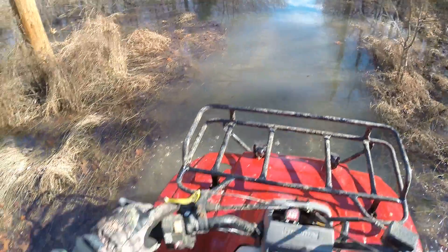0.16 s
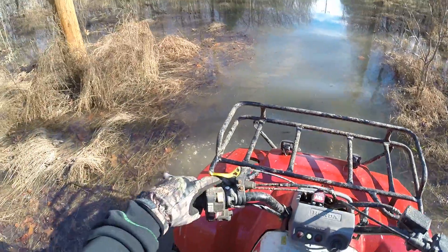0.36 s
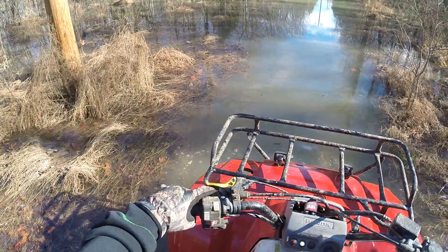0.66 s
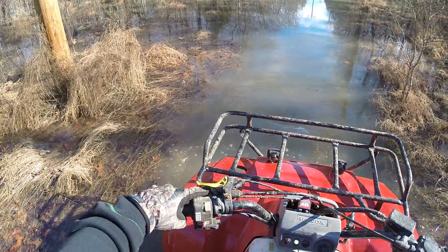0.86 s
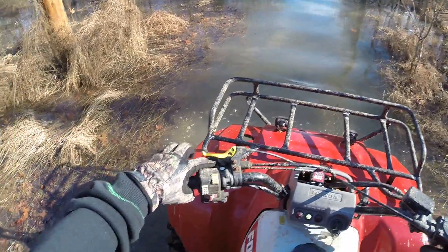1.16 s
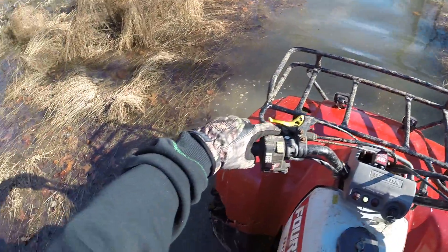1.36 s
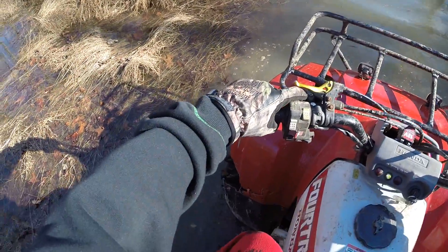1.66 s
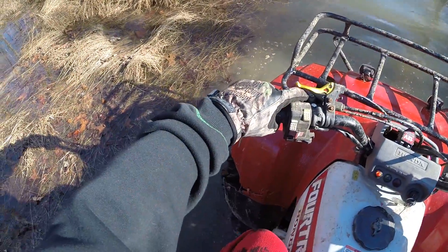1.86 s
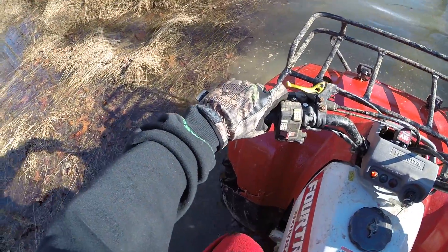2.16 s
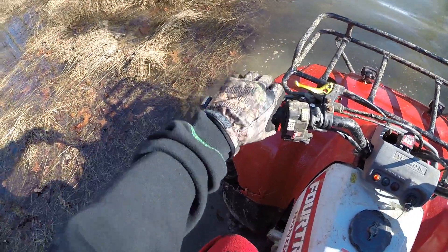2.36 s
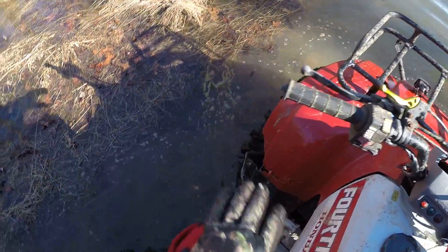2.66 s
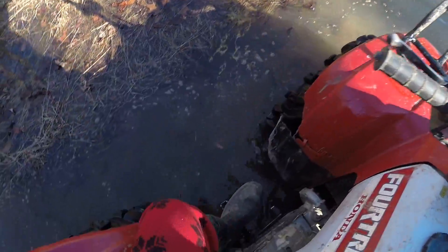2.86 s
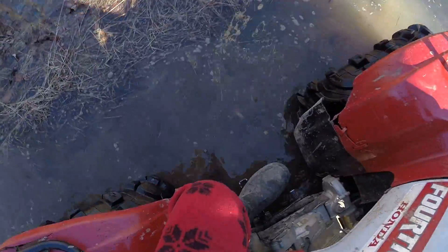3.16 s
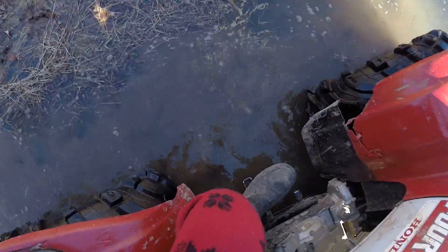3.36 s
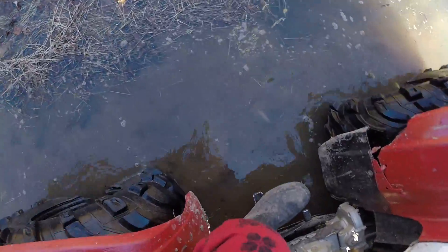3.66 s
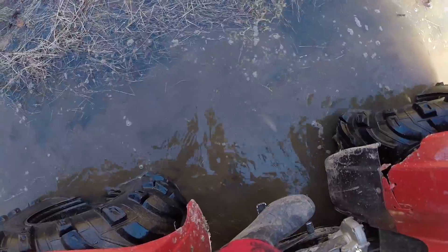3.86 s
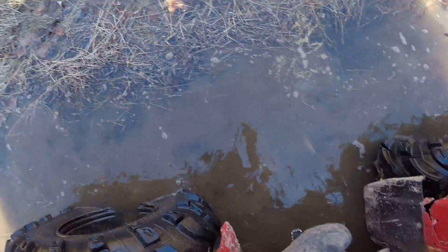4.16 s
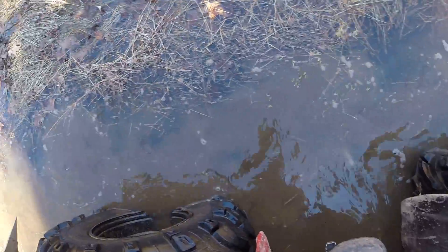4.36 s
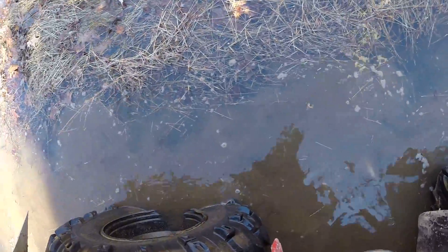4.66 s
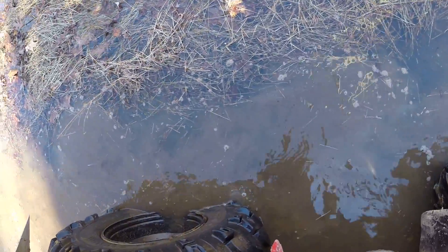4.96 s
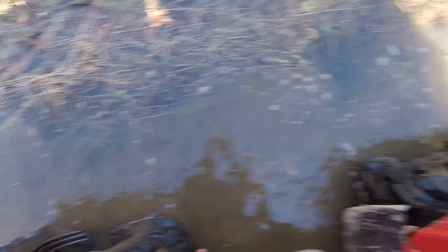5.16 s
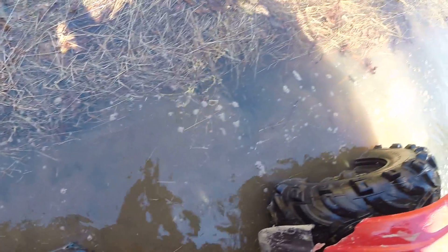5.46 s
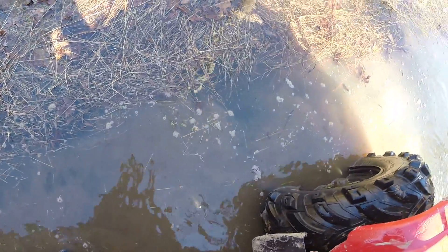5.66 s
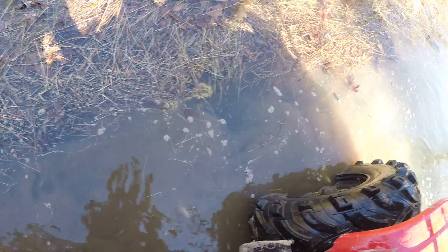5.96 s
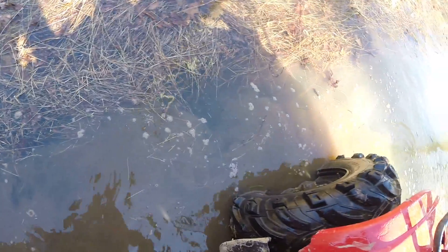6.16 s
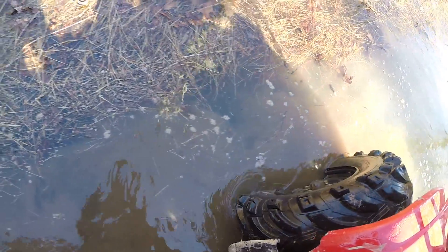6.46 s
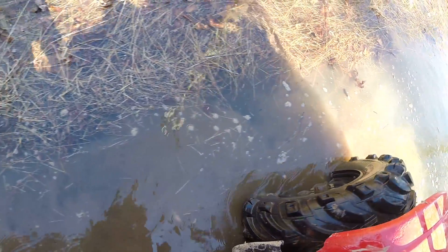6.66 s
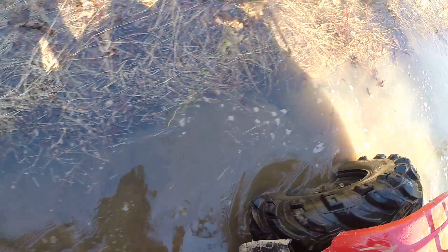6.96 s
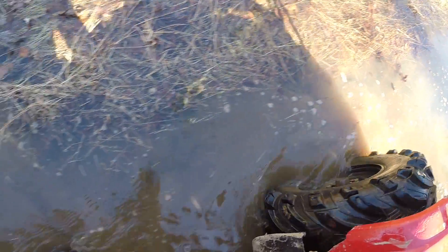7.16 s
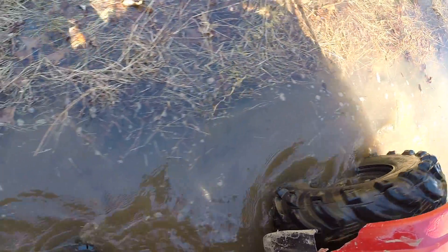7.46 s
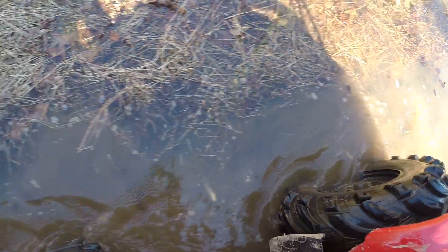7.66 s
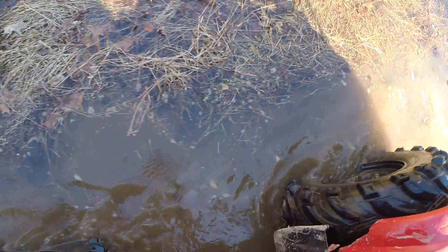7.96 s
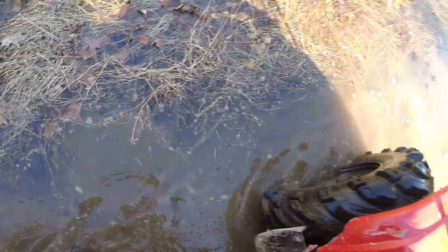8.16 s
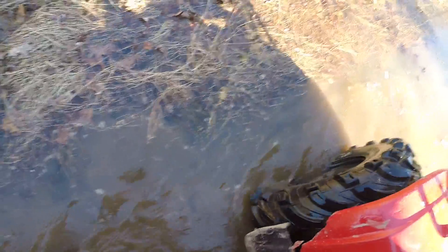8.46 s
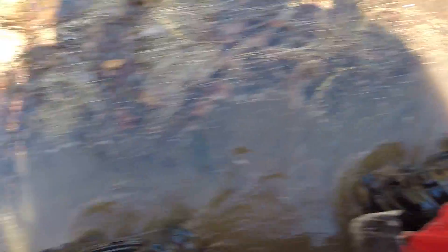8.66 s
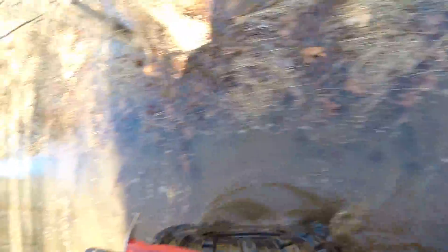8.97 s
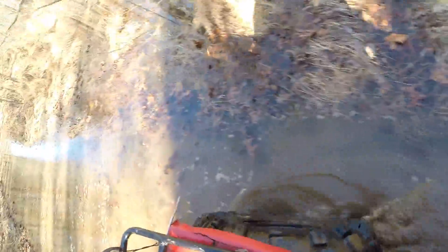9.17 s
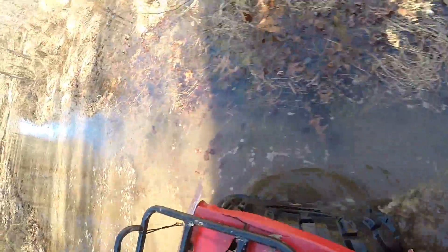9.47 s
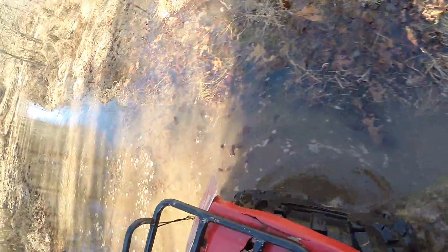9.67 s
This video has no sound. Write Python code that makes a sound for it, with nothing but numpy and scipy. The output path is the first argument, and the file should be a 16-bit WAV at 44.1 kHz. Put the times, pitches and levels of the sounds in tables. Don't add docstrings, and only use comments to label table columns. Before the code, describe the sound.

Close, lumpy quad bike idle with misfires, a sharp lever snap, then faster chugging under throttle while water burbles softly at the wheel.

```python
import sys
import numpy as np
from scipy import signal
from scipy.fft import rfft, irfft
from scipy.io import wavfile
from scipy.ndimage import uniform_filter1d

SR = 44100
rng = np.random.default_rng(int(sys.argv[2]) if len(sys.argv) > 2 else 0)


def waveform_to_disk(signal):
    frames = np.transpose(np.atleast_2d(signal))
    scaled = np.clip(frames, -1, 1) * 32767
    samples = np.round(scaled).astype(np.int16)
    wavfile.write(sys.argv[1], SR, samples)


def gain_from_decibels(decibels):
    exponent = np.asarray(decibels, float) / 20
    return 10 ** exponent


N = 433062
TIME = np.arange(N) / SR
HZ = np.fft.rfftfreq(N + 2394, 1 / SR) + 1


def curve(table, column=1):
    return np.interp(TIME, [row[0] for row in table], [row[column] for row in table])


def unit(x):
    return x / np.sqrt(np.mean(x ** 2))


def colour(x, gain):
    return irfft(rfft(x, 2 * len(HZ) - 2) * gain)[:N]


def band(lo_hz, hi_hz, order=4):
    low_cut = 1 + (lo_hz / HZ) ** (2 * order)
    high_cut = 1 + (HZ / hi_hz) ** (2 * order)
    return 1 / np.sqrt(low_cut * high_cut)


def walk(rate):
    k = int(SR / rate)
    held = np.repeat(rng.standard_normal(N // k + 1), k)[:N]
    return unit(uniform_filter1d(uniform_filter1d(held, k), k))


def span(start_ms, end_ms):
    return np.arange(int(start_ms * SR / 1000), int(end_ms * SR / 1000)) / SR


def add(out, t, piece):
    i = int(t * SR)
    part = piece[max(-i, 0):max(N - i, 0)]
    out[max(i, 0):max(i, 0) + len(part)] += part


# t/s, firing rate/Hz, full thump level/dB
ENGINE = [(0.0, 12.705, -26.8), (0.8, 11.427, -26.7), (3.09, 10.423, -26.1), (4.36, 10.611, -24.7),
          (4.96, 11.669, -24.5), (5.87, 11.766, -23.6), (5.99, 13.896, -22.5), (6.13, 15.395, -21.5),
          (6.62, 16.04, -21.6), (6.96, 15.757, -21.7), (7.79, 13.866, -22.9), (8.17, 14.379, -23.0),
          (8.4, 16.402, -21.9), (8.83, 17.051, -21.5), (9.24, 16.281, -23.8), (9.41, 14.623, -24.7),
          (9.63, 12.96, -24.4), (9.82, 14.487, -24.2)]
# t/s, shortfall level/dB, share of a cycle the flywheel then loses
MISFIRES = [(0.083, -2.5, 0.043), (0.166, -1.0, 0.019), (0.414, -18.0, 0.093), (0.677, -1.0, 0.103),
            (0.77, -1.5, 0.1), (1.044, -4.0, 0.031), (1.309, -11.5, -0.002), (1.495, -5.5, 0.103),
            (1.678, -1.5, 0.038), (1.774, -4.0, 0.058), (1.87, -2.0, 0.024), (2.237, -8.5, -0.061),
            (2.422, -4.5, 0.047), (2.614, -5.5, 0.049), (2.808, -2.5, 0.072), (3.006, -4.5, 0.126),
            (3.209, -9.0, 0.096), (3.41, -7.5, 0.101), (3.802, -1.0, 0.115), (3.904, -1.5, 0.095),
            (4.007, -2.5, 0.119), (4.207, -12.0, 0.048), (4.403, -2.5, 0.096), (4.776, -2.2, 0.127),
            (5.128, -2.0, -0.021), (5.3, -5.3, 0.079), (5.643, -8.3, 0.025), (5.819, -9.0, 0.084),
            (9.275, -3.0, 0.061), (9.479, -3.5, 0.019)]
START_CYCLE, LABOUR_S = -.057, .06


def firings():
    t = np.arange(0, N / SR, .001)
    at, short_db, lost = np.transpose(MISFIRES)
    s, hz, db = np.transpose(ENGINE)
    labour = np.clip((t[:, None] - at - .005) / LABOUR_S, 0, 1) @ lost
    cycles = START_CYCLE + np.cumsum(np.interp(t, s, hz)) / 1000 - labour
    times = np.interp(np.arange(int(cycles[-1]) + 1), cycles, t)
    weak = np.abs(times[:, None] - at).argmin(axis=0)
    times[weak] = at
    short = np.zeros(len(times))
    short[weak] = short_db
    return times, np.interp(times, s, db) + short, short


def revs():
    return np.log2(curve(ENGINE) / 14)


# t/s, pose (0 up, 1 down at the footrest, 2 out over the wheel, 3 leaning in, 4 back)
POSE = [(0, 0), (2.65, 0), (3.0, 0.62), (5.6, 1.5), (6.05, 2), (7.95, 2), (8.3, 3), (8.75, 3), (9.08, 4),
        (9.82, 4)]


def shares():
    return [np.clip(1 - np.abs(curve(POSE) - j), 0, 1) for j in range(5)]


# f/Hz, gain, arrival before the peak/ms, t60/s; the last row is the silencer can
PIPE_IDLE = [(77.7, 1.39, 6.14, .05), (122.8, -4., 6.36, .02), (177.5, 1.75, 6.39, .06),
             (320., .57, 3.1, .023), (388., -.52, 2.63, .095)]
PIPE_LOW = [(164.4, -0.68, 5.81, 0.064), (84.4, 2, 5.13, 0.04), (190.4, -3, 3.433, 0.035),
            (217.8, -0.84, 5.35, 0.06), (303, 0.33, 4.62, .028), (371, 0.65, 5.47, 0.069)]
PIPE_LOAD = [(57, -1.72, 4.3, 0.035), (93.3, 2.5, 3.35, 0.023), (203.5, -3, 2.83, 0.035),
             (230, 4.0, 2.073, 0.014), (378.4, 0.88, 2.824, 0.057)]
# t/s, level/dB
SHADE = [(0, -2.5), (.5, 0.5), (1.8, 1.5), (2.05, -3), (2.3, -7), (2.42, 2), (2.7, -3), (3.2, -4),
         (3.5, -1), (3.9, 1.5), (4.7, 2), (5.2, -0.5), (5.7, 0.5), (6.0, 0.5)]


def exhaust():
    out = np.zeros(N)
    t = span(-10, 110)
    times, thump_db, short_db = firings()
    ring_chance, thump_chance, heat = rng.standard_normal((3, len(times)))
    thump_db = thump_db + 0.18 * thump_chance
    rings = -.45 * short_db + 1.2 * ring_chance - .9 + np.interp(times, *np.transpose(SHADE))
    weights = np.array(shares())
    pipes = (PIPE_IDLE, PIPE_LOW, PIPE_LOAD, PIPE_LOAD, PIPE_LOW)
    for s, db, ring_db, c in zip(times, thump_db, rings, heat):
        for pipe, weight in zip(pipes, weights[:, int(s * SR)]):
            if weight > 0:
                hz, gain, ms, t60 = np.transpose(pipe)[:, :, None]
                u = np.clip(t * (1 + 0.0076 * c) + ms / 1000, 0, None)
                modes = gain * np.sin(2 * np.pi * hz * u) * gain_from_decibels(-60 * u / t60)
                thump = modes[:-1].sum(axis=0) + gain_from_decibels(ring_db) * modes[-1]
                add(out, s + t[0], weight * gain_from_decibels(db + 0.5) * thump)
    slug = np.exp(-.5 * (span(-4, 4) / 0.00064) ** 2)
    out = signal.fftconvolve(out, slug / slug.sum(), "same")
    out = colour(out, band(38, 5000, order=2))
    echo = np.roll(colour(out, band(30, 72, order=2)), int(0.03143 * SR))
    return out + gain_from_decibels(-12) * echo


# t/s, deepest f/Hz, next f/Hz, level against the thump/dB, deepest level/dB
BARK = [(3, 640, 800, -35, 4), (3.6, 644, 830, -29.5, 2), (4.6, 653, 850, -30, 3),
        (5.6, 640, 850, -29.5, 0), (6.1, 620, 850, -24, -3), (7.4, 620, 870, -27.5, -6),
        (8, 650, 885, -26, -8), (8.3, 680, 900, -26.5, 3.5), (8.9, 680, 890, -26, 4),
        (9.3, 760, 920, -30, 4), (9.82, 740, 900, -39, 1)]


def bark():
    out = np.zeros(N)
    t = span(0, 30)
    base, low, level, deep = (curve(BARK, column=k) for k in range(1, 5))
    envelope = (1 - np.exp(-t / 0.0024)) * gain_from_decibels(-60 * t / 0.026)
    times, thump_db, _ = firings()
    for s, db, c in zip(times, thump_db, rng.standard_normal((len(times), 2, 5, 1))):
        i = int(s * SR)
        hz = np.array([[base[i]], [low[i]], [1170.], [1340.], [1620.]]) * (1 + .012 * c[0])
        tone_db = np.array([[deep[i]], [0], [-1.5], [-3], [-6]]) + 1.5 * c[1]
        tones = gain_from_decibels(tone_db) * np.sin(2 * np.pi * hz * t)
        add(out, s - .0024, gain_from_decibels(db + level[i] + 8.0) * tones.sum(axis=0) * envelope)
    slap = colour(out * (1 + 0.77 * walk(300)), band(1370, 1720, order=3))
    slap_ms, slap_db = 11.5, 1
    return out + gain_from_decibels(slap_db) * np.roll(slap, int(slap_ms * SR / 1000))


# share of the cycle, level/dB
VALVES = [
    (.29, -2.5),
    (.55, -12),
    (.79, -1),
]


def beats(burst_db, rise_ms, decay_ms, tick_db):
    s, db, _ = firings()
    gate = np.ones(N)
    t = span(-25, 70)
    burst = np.exp(np.where(t < 0, t * 1000 / rise_ms, -t * 1000 / decay_ms))
    tick = np.exp(-span(0, 15) / 0.0081)
    chance = rng.standard_normal((len(s), 4))
    force = gain_from_decibels(0.61 * (db + 21.0))
    for start, period, f, c in zip(s, np.diff(s, append=s[-1] + .073), force, chance):
        add(gate, start + t[0], (gain_from_decibels(burst_db) - 1) * f * gain_from_decibels(0.74 * c[3]) * burst)
        slow_db = 5 * np.log2(min(period, .1) / .09)
        for (share, valve_db), scatter in zip(VALVES, c):
            height = (gain_from_decibels(tick_db) - 1) * gain_from_decibels(valve_db + 3.2 * scatter + slow_db)
            add(gate, start + share * period, height * tick)
    return gate


def silencer():
    gas = beats(20.5, 1.5, 15.0, .3) * rng.standard_normal(N)
    up, down, out, lean, back = shares()
    high = unit(colour(gas, band(267, 380, order=6)))
    low = unit(colour(gas, band(205, 262, order=6)))
    return high * gain_from_decibels(-63.0 + curve(SHADE)) * up + low * (gain_from_decibels(-58) * down + gain_from_decibels(-64.0) * (out + lean))


# casing level/dB, fins level/dB, head level/dB, tappet level/dB
CLATTER = [
    (-61, -60, -66, -76),
    (-58.5, -59, -61, -69.5),
    (-57.5, -58.5, -60.5, -70.5),
    (-57.5, -59, -60, -71.5),
    (-57.5, -59.5, -62, -72),
]
CLATTER_HZ = [450, 2200, 5200, 8200, 11000]
CLATTER_DB_PER_OCTAVE = (4.6, 10.1, 9.8, 13.3)
# low f/Hz, high f/Hz, burst level/dB, burst rise/ms, burst decay/ms, valve tick level/dB
PARTS = [(402, 970, 6.5, 3.6, 11, 0.5), (1054, 2210, 8, 4.6, 16, 6), (2180, 4130, 8, 8.7, 20, 6),
         (4180, 5400, 13.5, 4.8, 13, -0.5), (5050, 8700, 11.5, 5.1, 9.2, 5.5),
         (8140, 13000, 7, 11, 27, 11.5)]
# f/Hz, width/Hz, level/dB
HEAD_UP = [(457, 2700, -7), (1130, 200, -9), (1780, 1100, -12.5), (2850, 980, -13), (3560, 540, -13),
           (4200, 1600, -15.5), (4767, 230, -5.5), (5880, 900, -14), (6800, 809, -17), (7700, 660, -20),
           (8845, 1100, -24.5), (9960, 1300, -20.5), (13066, 224, -34)]
HEAD_DOWN = [(620, 1500, -6), (1370, 250, -9.5), (1834, 450, -4), (2790, 610, -11), (3600, 1300, -12.5),
             (4630, 770, -10), (5780, 660, -7.5), (6840, 590, -11.5), (7647, 840, -17.5), (8631, 110, -18),
             (8980, 620, -17), (10240, 949, -24), (11900, 190, -28)]
HEAD_OUT = [(611, 1600, -4), (1490, 730, 0), (2170, 330, -5), (2750, 780, -3), (3620, 830, -3.5),
            (4700, 690, -2.5), (5860, 610, -1.5), (6730, 510, -1), (7570, 550, -7.5), (8890, 670, -13),
            (9877, 1500, -22), (11256, 282, -31), (12060, 400, -24), (12467, 1271, -27)]
HEAD_LEAN = [(680, 400, -2), (1200, 300, 0), (1600, 440, 0.5), (2060, 230, -6), (2680, 590, -2),
             (3540, 740, -5.5), (4660, 680, -1.5), (5800, 530, -1), (6715, 510, 0.5), (7570, 550, -8),
             (8860, 670, -14), (9877, 1400, -21), (12060, 400, -25)]
HEAD_BACK = [(660, 610, 0), (1330, 610, -1.5), (1930, 440, 2.5), (2510, 230, 0.5), (3350, 2500, -5),
             (4690, 190, 0), (5710, 560, 0), (6930, 1100, -12.5), (8930, 750, -18.5), (10000, 880, -22.5),
             (12156, 2499, -33)]
# f/Hz, width/Hz, level/dB
COVERS = [
    [(1690, 72, -5)],
    [(1717, 110, -0.5), (5750, 37, 1.5), (6135, 32, -2.5)],
    [(1367, 54, 5), (2553, 85, 2), (5820, 66, 7)],
    [(1695, 73, 1), (5790, 90, 4), (6135, 35, 4)],
    [(5740, 60, 5.5)],
]
# f/Hz, width/Hz, depth share
NOTCHES = [
    (2320, 205, 0.39),
    (3175, 190, 0.39),
    (5150, 280, 0.42),
]
# t/s, level/dB, half length/s
LEANS = [
    (2.1, 3.5, 0.13),
    (4.3, 0.5, 0.33),
    (8.82, 4, 0.14),
]


def resonance(peaks):
    return np.sqrt(sum(gain_from_decibels(2 * db) / (1 + (2 * (HZ - hz) / width) ** 2) ** 2 for hz, width, db in peaks))


def block():
    heads = (HEAD_UP, HEAD_DOWN, HEAD_OUT, HEAD_LEAN, HEAD_BACK)
    poses = [resonance(peaks + cover) for peaks, cover in zip(heads, COVERS)]
    housing = 1
    for hz, width, depth in NOTCHES:
        housing = housing * (1 - np.clip(depth, 0, .9) * np.exp(-((HZ - hz) / width) ** 2 * 2))
    out, weights, octaves = 0, np.array(shares()), revs()
    for lo_hz, hi_hz, *beat in PARTS:
        k = np.searchsorted(CLATTER_HZ, (lo_hz + hi_hz) / 2)
        group = (HZ > CLATTER_HZ[k - 1]) & (HZ < CLATTER_HZ[k])
        unsteady = gain_from_decibels(0.78 * walk(40) + 0.98 * walk(5))
        rattle = unit(beats(*beat) * unsteady * rng.standard_normal(N))
        rattle = rfft(rattle, 2 * len(HZ) - 2) * band(lo_hz, hi_hz, order=8) * housing
        pose_db = np.array(CLATTER)[:, k - 1] @ weights
        level = gain_from_decibels(pose_db + CLATTER_DB_PER_OCTAVE[k - 1] * octaves + 1.0)
        if k == 4:
            level = level * gain_from_decibels(sum(db * np.exp(-((TIME - s) / half) ** 2) for s, db, half in LEANS))
        for gain, share in zip(poses, weights):
            gain = gain / np.sqrt(np.mean((gain * group) ** 2))
            out = out + share * level * irfft(rattle * gain)[:N]
    return out


def tappet():
    tick, puff = np.zeros(N), np.zeros(N)
    t = span(0, 30)
    times = firings()[0]
    for s, period, c in zip(times, np.diff(times), rng.standard_normal(len(times))):
        at, noise = s + .8 * period, rng.standard_normal(len(t))
        tick_db = -48 - 33 * ((s - 4.25) / 1.3) ** 2 + 2.0 * c
        puff_db = -36.5 - 28 * ((s - 4.1) / 3.2) ** 2 + 1.3 * c
        early_db = -44.5 - 26 * ((s - 4.2) / 3.4) ** 2 - 1.4 * c
        add(tick, at, gain_from_decibels(tick_db) * noise * np.exp(-t / 0.0031))
        add(puff, at, gain_from_decibels(puff_db) * noise * (1 - np.exp(-t / 0.0028)) * np.exp(-t / 0.0094))
        add(puff, s + .22 * period, gain_from_decibels(early_db) * noise[::-1] * np.exp(-t / 0.0085))
    return colour(tick, band(8500, 10000, order=8)) + colour(puff, band(1450, 1930, order=4))


# start t/s, end t/s, from f/Hz, to f/Hz, level/dB
SWINGS = [(5.88, 6.25, 3640, 3520, -66), (5.6, 6.15, 2560, 2570, -66.5), (6.85, 7.2, 2950, 3080, -62.5),
          (6.9, 7.3, 3580, 3620, -67), (3.0, 3.95, 5600, 5540, -70.5), (8.75, 9.05, 5810, 5780, -59),
          (9.0, 9.6, 5650, 5520, -64), (8.25, 8.7, 2750, 2800, -65)]


def panels():
    shake = beats(9.0, 4.0, 16.0, 3.0)
    out = np.zeros(N)
    for start, end, from_hz, to_hz, db in SWINGS:
        i = int(start * SR)
        u = np.linspace(0, 1, int((end - start) * SR))
        wobble = uniform_filter1d(rng.standard_normal((2, len(u))), size=330, axis=1)
        phase = 2 * np.pi * np.cumsum(from_hz + (to_hz - from_hz) * u) / SR
        ring = unit(shake[i:i + len(u)] * (wobble[0] * np.sin(phase) + wobble[1] * np.cos(phase)))
        add(out, start, gain_from_decibels(db) * np.sin(np.pi * u) * ring)
    return out


# t/s, peak level/dB, relative treble level/dB, relative body level/dB, length/ms
CLICKS = [(1.563, -47, -30, -20, 4.5), (1.8442, -52, -21, 16, 4.3), (1.8757, -37, -16, -7, 4.4),
          (1.8815, -39, -17, -12, 3.0), (1.8865, -48, -20, -8, 3.5), (1.8942, -43, -14, -12, 4.7),
          (1.9015, -47, -18, -8, 4.5), (1.9088, -45.5, -21, -11, 5.0), (1.917, -53, -16, -9, 6.0),
          (2.0253, -46, -11, -9, 5.5), (2.459, -21, -8, -24, 2.3), (2.835, -45.5, -19, -12, 4.7),
          (9.245, -45, -20, -6, 5.0), (9.5614, -51, -8.5, -12, 4.2)]
# f/Hz, level/dB, t60/s
LEVER = [(2050, -9, .012), (5100, -11, 0.011), (2900, -4.5, 0.024), (3520, -3, 0.019), (7350, -13, 0.011),
         (4370, 0.5, 0.022), (4680, 0.5, 0.023), (5670, -3.5, 0.016), (7400, 0, 0.023), (7770, 1, 0.031),
         (8810, -4, 0.012), (10570, -4.5, 0.028), (11500, -8, 0.017), (14920, -5, .015)]
# t/s, peak level/dB, f/Hz
KNOCKS = [
    (1.8377, -48, 1970),
    (1.8855, -47, 1890),
    (1.9005, -47, 1600),
    (7.5403, -36, 1350),
    (8.496, -30.5, 1535),
]


def clicks():
    out = np.zeros(N)
    grit = np.zeros(N)
    t, short = span(0, 50), span(0, 15)
    for s, db, treble_db, body_db, ms in CLICKS:
        light = db < -30
        scrape = rng.standard_normal(len(short)) * np.sqrt(np.clip(1 - short * 1000 / ms, 0, 1))
        hit = 0
        for hz, mode_db, t60 in LEVER:
            swell = signal.fftconvolve(gain_from_decibels(-60 * t / t60), scrape ** 2)[:len(t)]
            struck_hz = hz * (1 + 0.0355 * light * rng.standard_normal())
            ring = swell * np.sin(2 * np.pi * (struck_hz * t + rng.random()))
            level = mode_db
            if hz > 7000:
                level += (treble_db + 9.0) * (1.5 if hz > 10000 else 1)
            if hz > 10000 and light:
                level -= 6.0
            if hz < 3200:
                level += min(body_db, -9.) + 19.0
            hit = hit + unit(ring) * np.sqrt(t60) * gain_from_decibels(level)
        add(out, s, gain_from_decibels(db + 0.7) * hit / np.abs(hit).max())
        rough = rng.standard_normal(len(t)) * np.exp(-t / (ms * 0.0014))
        add(grit, s, gain_from_decibels(db - 8.0 + 2.9 * light) * rough)
    for s, db, hz in KNOCKS:
        envelope = (1 - np.exp(-t / 0.0012)) * gain_from_decibels(-60 * t / 0.027)
        add(out, s, gain_from_decibels(db) * np.sin(2 * np.pi * hz * t) * envelope)
    grit = colour(grit, band(1400, 5700, order=1) * band(10, 9000, order=2))
    return colour(out, band(1050, 16000, order=4)) + grit


# t/s, level/dB
SLOP = [(0, -94), (3, -69), (4, -65.5), (5.8, -73), (6.5, -60.5), (8, -79), (8.6, -70), (9.3, -67),
        (9.82, -67)]


def water(count=1500):
    out = np.zeros(N)
    t = span(0, 20)
    for when, pitch, strength, damping in rng.random((count, 4)):
        hz = 900 * 4.46 ** pitch
        decay = np.exp(-t * hz / (1.2 + 3 * damping))
        ring = np.sin(2 * np.pi * hz * t * (1 + 0.0216 * hz * t)) * decay
        add(out, when * N / SR, gain_from_decibels(-2.5 * np.log(1 - strength)) * ring)
    return unit(out) * gain_from_decibels(curve(SLOP))


# t/s, peak level/dB, half length/s
GUSTS = [(0, -42.5, .07), (.27, -39, 0.15), (1.78, -50, 0.43), (2.416, -45, 0.085), (3.5, -61, .3),
         (5.4, -54, 0.25), (6.15, -58, 0.17), (7.6, -53, 0.37), (8.67, -48, 0.13), (9.82, -50, 0.34)]


def air():
    wind = unit(colour(rng.standard_normal(N), band(7.7, 34, order=2)))
    frame = band(50, 182, order=2) + gain_from_decibels(-27) * band(290, 340, order=3)
    hum = unit(colour(rng.standard_normal(N), frame))
    breeze_db, rumble_db, rumble_db_per_octave = -56.5, -54, 8
    force = gain_from_decibels(breeze_db + 4.0 * walk(6))
    for s, db, half in GUSTS:
        force = force + gain_from_decibels(db) * np.exp(-((TIME - s) / half) ** 2)
    return wind * force + hum * gain_from_decibels(rumble_db + rumble_db_per_octave * revs() + 1.6 * walk(12))


def camera():
    whine_hz, frame_hz = 13906, 59.94
    hiss = unit(colour(rng.standard_normal(N), band(3000, 17000, order=8))) * gain_from_decibels(-76.5)
    on = uniform_filter1d(1. * (((TIME + .0040) * frame_hz) % 1 < .76), size=40)
    return hiss + gain_from_decibels(-73.5) * on * np.sin(2 * np.pi * whine_hz * TIME)


def scene():
    engine = exhaust() + bark() + silencer() + block() + tappet() + panels()
    return (engine + clicks() + water() + air() + camera())[None]


def starve(x):
    starve_hz, top_hz, db_per_khz = 14250, 15250, 2.6
    hz, t, z = signal.stft(x, SR, nperseg=2048, noverlap=1024)
    power = uniform_filter1d(np.abs(z) ** 2, size=6, axis=0)[3:1020:6] + 1e-30
    over = 10 * np.log10(power / np.median(power, axis=1, keepdims=True))
    centre = hz[3:1020:6, None]
    busy = 4.5 * np.interp(t, TIME, revs())
    rising = (centre - starve_hz) * db_per_khz / 1000 + 1.2 - busy
    upper = np.where(centre > top_hz, 20, rising)
    lower = np.where((centre > 12700) & (centre < 13700), -4, -99)
    need = np.where(centre > starve_hz, upper, lower)
    z[:1020] *= np.repeat(over > need, 6, axis=0)
    return signal.istft(z, SR, nperseg=2048, noverlap=1024)[1][:N]


def top_cut(x):
    return signal.sosfilt(signal.butter(12, 16290, fs=SR, output="sos"), x)


def record(dry):
    rolled = colour(dry[0], band(6.4, 15400, order=8))
    mix = starve(rolled)[None]
    return top_cut(mix)


dry = scene()
out = record(dry)
waveform_to_disk(out)
```